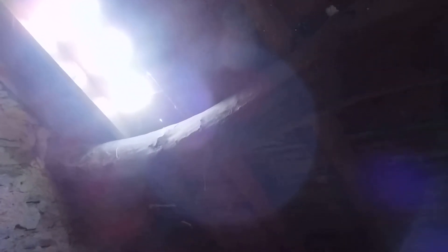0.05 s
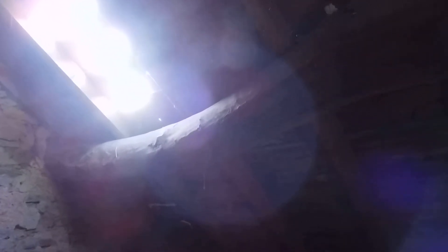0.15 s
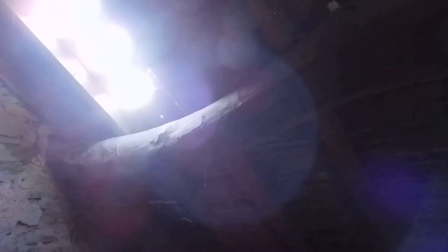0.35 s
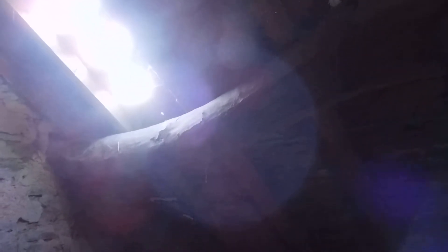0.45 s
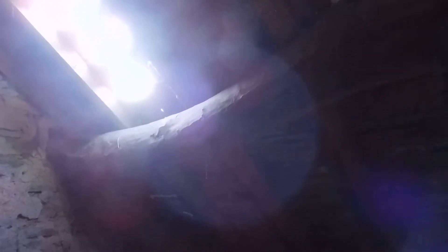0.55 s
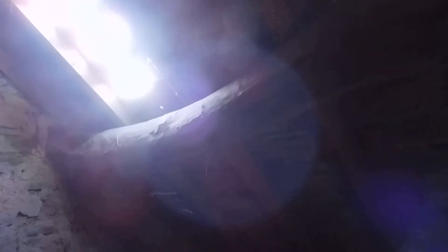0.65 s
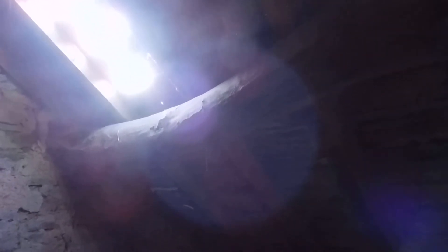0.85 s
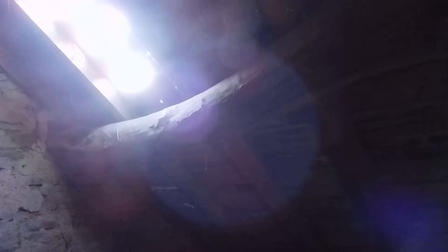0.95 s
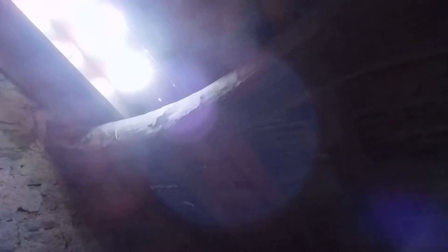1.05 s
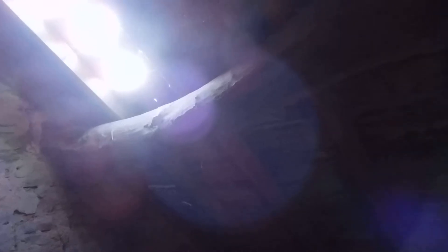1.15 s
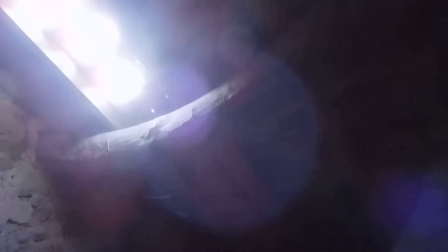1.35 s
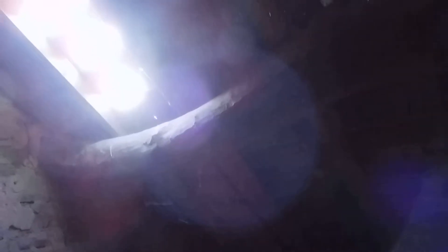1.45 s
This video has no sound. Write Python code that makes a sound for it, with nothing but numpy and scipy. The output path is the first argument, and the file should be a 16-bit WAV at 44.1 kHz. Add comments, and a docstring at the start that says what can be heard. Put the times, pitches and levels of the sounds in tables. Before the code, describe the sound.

Boards being moved, knocking sharply and scraping over grit in a small wooden space.

```python
"""Boards and dry debris are shifted close by in a low, dusty wooden space.
Over faint background noise, weight bumps on the boards, gritty scrapes begin, and wood rubs with a
thin rasp before it lands in a sharp knock. Crumbs snap among more scrapes and a lesser knock, then a
second sharp knock falls. A hollow thud follows, and light taps and scrapes close the scene.
Throughout, near walls throw everything back in a short, boxy tail."""
import sys
import numpy as np
from scipy import signal
from scipy.fft import rfft, irfft
from scipy.io import wavfile

SR = 44100
rng = np.random.default_rng(int(sys.argv[2]) if len(sys.argv) > 2 else 0)


def transcribe(u):
    """Save the signal u as a 16-bit wav file named by the first command-line argument.

    u: samples, shape (n,) or (channels, n), limited to [-1, 1]; the rate is SR.
    q: integer samples, one column per channel.
    """
    v = np.clip(np.atleast_2d(u).T, -1, 1)
    q = np.round(v * 32767).astype(np.int16)
    wavfile.write(sys.argv[1], SR, q)


N = 66150


def amp(db):
    """The decibel scale: amplitude grows tenfold every 20 dB."""
    return 10 ** (np.asarray(db) / 20)


def unit_rms(x):
    """Normalisation to a root mean square of 1."""
    return x / np.sqrt(np.mean(x ** 2) + 1e-20)


def curve_at(points, hz):
    """Interpolation on a logarithmic frequency axis."""
    frequency, value = np.transpose(points)
    return np.interp(np.log(hz + 1), np.log(frequency + 1), value)


def add(mix, start_s, sound):
    """Superposition: a sound sums into the mix from its start time."""
    part = mix[max(round(start_s * SR), 0):][:len(sound)]
    part += sound[:len(part)]


def convolve(x, response):
    """Convolution: each input sample launches a copy of the impulse response, channel by channel."""
    return signal.fftconvolve(np.atleast_2d(x), np.atleast_2d(response), axes=1)[:, :N]


def equalise(x, spectrum, share=1):
    """Zero-phase filtering by a spectrum whose decibels are scaled by share."""
    hz = np.fft.rfftfreq(x.shape[-1], 1 / SR)
    return irfft(rfft(x) * amp(share * curve_at(spectrum, hz)), x.shape[-1])


def click(spectrum, tilt_db_per_octave=0, size=2048):
    """Minimum phase: the most compact causal pulse with a given spectrum, at unit energy."""
    hz = abs(np.fft.fftfreq(size, 1 / SR))
    log_gain = np.log(amp(curve_at(spectrum, hz) + tilt_db_per_octave * np.log2(hz + 100)))
    pulse = np.fft.ifft(np.exp(np.conj(signal.hilbert(log_gain)))).real[:size // 2]
    return pulse / np.linalg.norm(pulse)


def widen(mid, side, width):
    """Mid-side stereo: the filtered side signal adds on the left and subtracts on the right."""
    side = equalise(side, width)
    return np.array([mid + side, mid - side])


def stroke(peak_s, rise_s, fall_s):
    """Contact pressure: a Gaussian rise to the peak, then exponential decay."""
    t = np.arange(N) / SR - peak_s
    return np.exp(-(np.minimum(t, 0) / rise_s) ** 2 - 2 * np.maximum(t, 0) / fall_s)


def slips(rate_per_s=5500, spread_db=4):
    """Shot noise: a dense random train of tiny slips of uneven size."""
    size = amp(spread_db * np.minimum(rng.exponential(1, N), 3))
    return unit_rms(size * rng.choice([-1, 1], N) * (rng.random(N) < rate_per_s / SR))


# Spectrum of the airy noise: frequency_hz, level_db
AIR_SPECTRUM = [(20, -4.5), (45, -11), (90, -13), (200, -9.5), (500, -3.5), (1000, -2), (2200, -4.5),
                (4000, -10.5), (8000, -16.5), (15500, -22.5)]
# Stereo width of the airy noise: frequency_hz, side_minus_mid_db
AIR_WIDTH = [(50, -11), (200, -4), (500, -1), (1000, 0), (16000, 0)]
# Envelopes of the airy noise, the low mids and the rumble: time_s, level_db
AIR_ENVELOPE = [(0, -54), (.75, -52.5), (1.25, -55), (1.5, -55.5)]
LOW_MID_ENVELOPE = [(0, -62), (.4, -61), (.8, -63), (1.1, -70.5), (1.5, -81)]
RUMBLE_ENVELOPE = [(0, -72), (.3, -90), (.52, -68), (.65, -79), (.8, -70), (1, -94), (1.5, -87)]
def background(rumble_hz=50):
    """Diffuse field: partly correlated noise in airy, dull and rumbling bands that drift in level."""
    t = np.arange(N) / SR
    air, low_mids, rumble = (widen(*rng.standard_normal((2, N)), width)
                             for width in (AIR_WIDTH, ROOM_WIDTH, ROOM_WIDTH))
    air = equalise(air, AIR_SPECTRUM)
    low_mids = equalise(low_mids, BUMP_SPECTRUM)
    rumble = signal.sosfilt(signal.butter(2, rumble_hz, fs=SR, output="sos"), rumble)
    bands = [(air, AIR_ENVELOPE), (low_mids, LOW_MID_ENVELOPE), (rumble, RUMBLE_ENVELOPE)]
    return sum(unit_rms(band) * amp(np.interp(t, *np.transpose(envelope))) for band, envelope in bands)


# Weight bearing on the boards: peak_s, rise_s, fall_s, level_db
BUMP_STROKES = [(0.116, 0.0066, .04, -47.5), (0.244, 0.047, 0.11, -46.5), (.375, 0.014, 0.066, -55),
                (0.484, 0.036, 0.04, -39), (.62, .03, 0.047, -60), (.705, 0.039, 0.041, -42),
                (.840, 0.0082, 0.037, -47), (.955, 0.023, 0.05, -67)]
# Dull response of the boards: frequency_hz, level_db
BUMP_SPECTRUM = [(30, -43), (90, -22.5), (150, -11.5), (240, -7.5), (330, -9), (420, 3.5), (490, -1.5),
                 (565, 1.5), (640, -0.5), (800, 4.5), (1300, -27), (4000, -57), (16000, -73)]
def bumps():
    """Forced vibration: shifting weight drives the low resonances of the boards in soft thumps."""
    force = sum(amp(db) * stroke(peak, rise, fall) for peak, rise, fall, db in BUMP_STROKES)
    return convolve(force * slips(), click(BUMP_SPECTRUM))[0]


# Scraping strokes: peak_s, rise_s, fall_s, board_level_db, grit_level_db
SCRAPE_STROKES = [(0.119, 0.014, 0.03, -48.5, -54.5), (0.131, 0.013, 0.016, -49, -62),
                  (.208, 0.033, 0.038, -43, -61), (0.228, 0.0091, 0.011, -33.5, -59),
                  (0.235, 0.0046, 0.041, -23, -34.5), (0.358, 0.016, 0.046, -51, -50.5),
                  (0.376, 0.015, 0.033, -45.5, -58.5), (0.454, 0.023, 0.016, -37, -59),
                  (0.468, 0.0042, 0.034, -25.5, -37.5), (0.49, .012, 0.019, -33.5, -39),
                  (.515, 0.0031, 0.0034, -28, -33.5), (.610, 0.061, 0.05, -52, -77),
                  (.674, 0.022, 0.017, -45, -55), (0.685, 0.0053, 0.03, -29.5, -40.5),
                  (0.712, 0.0063, 0.01, -30, -50), (0.836, 0.0086, 0.042, -46, -68),
                  (0.947, 0.019, 0.05, -35.5, -45.5), (1.048, 0.026, 0.12, -51, -56.5),
                  (1.079, 0.0063, 0.026, -49.5, -67), (1.17, .012, 0.032, -49, -61),
                  (1.198, 0.011, 0.046, -46, -52.5), (1.37, 0.018, 0.044, -47.5, -49.5),
                  (1.402, 0.0065, 0.0095, -50.5, -60)]
# Response of the boards to one slip: frequency_hz, level_db
SCRAPE_SPECTRUM = [(40, -40), (140, -28), (280, -27), (420, -6), (650, -8.5), (1000, 1.5), (1500, -0.5),
                   (2500, -1.5), (3500, -12.5), (6000, -22), (16000, -68.5)]
def scrapes():
    """Stick-slip friction: the slips under each stroke shake the boards."""
    force = sum(amp(db) * stroke(peak, rise, fall) for peak, rise, fall, db, _ in SCRAPE_STROKES)
    return convolve(force * slips(), click(SCRAPE_SPECTRUM))[0]


# Spectrum of one crushed grain: frequency_hz, level_db
GRIT_SPECTRUM = [(300, -39), (1500, -6.5), (3500, 2.5), (5000, -2), (7500, -6), (11000, -8), (16000, -23)]
def grit():
    """Granular crushing: dust crunches in tiny bright clicks under the scraping strokes."""
    force = sum(amp(db) * stroke(peak, rise, fall) for peak, rise, fall, _, db in SCRAPE_STROKES)
    return convolve(force * slips(), click(GRIT_SPECTRUM))[0]


# Wood sliding on wood: peak_s, rise_s, fall_s, level_db, pitch_hz, bandwidth_hz
RUB_STROKES = [(.176, 0.00097, 0.02, -42, 2500, 420), (.215, .02, 0.04, -44, 2560, 400),
               (0.357, 0.0037, 0.019, -46.5, 2700, 394), (.382, 0.016, 0.043, -47.5, 873, 202),
               (.424, .002, 0.029, -42, 2590, 300), (0.941, 0.015, 0.025, -41.5, 4400, 2630)]
def rubs():
    """Resonance driven by friction: in each rub, slips excite one damped mode into a rasp."""
    out, t = np.zeros(N), np.arange(SR // 40) / SR
    for peak, rise, fall, db, hz, bandwidth in RUB_STROKES:
        ring = t * np.exp(-np.pi * bandwidth * t) * np.sin(2 * np.pi * hz * t)
        out += amp(db) * stroke(peak, rise, fall) * unit_rms(convolve(slips(), ring)[0])
    return out


# Wooden knocks and taps: start_s, level_db, tilt_db_per_octave, pitch_ratio
KNOCK_CONTACTS = [(.2313, 2.5, 3.3, 0.96), (0.2317, -3.5, -7.2, 0.81), (.2352, -2, -3.5, 1.1),
                  (.2369, 4, -3.5, 1.226), (.2522, -1, -2.5, 1.07), (0.4726, -0.5, -0.5, 0.85),
                  (.6805, 6, 0.1, 0.96), (0.6822, 0.5, 0.5, 0.85), (0.6855, 2.5, -2.5, 0.67),
                  (.6873, -2.5, -1.5, .95), (0.7076, -18, -10, 0.7), (.8250, -26.5, 0, 1.3),
                  (0.8553, -22, 0, 0.76), (1.0738, -26.5, 3, 0.88), (1.3561, -19.5, -4.5, 0.83),
                  (1.3972, -19.5, -3.5, .68)]
# Spectrum of the contact crack before tilt: frequency_hz, level_db
CRACK_SPECTRUM = [(40, -58.5), (150, -36.5), (400, -15.5), (800, -3.5), (1250, 3.5), (1800, 6), (2300, -4),
                  (3000, -5), (4200, -19), (7000, -27), (11000, -51), (16000, -56)]
# Modes of the wood before each contact's pitch ratio and tilt: pitch_hz, level_db, t60_s
KNOCK_MODES = [(930, -28.5, 0.019), (1320, -20.5, 0.012), (1804, -16, 0.012), (2627, -20.5, 0.014),
               (3106, -23.5, 0.012)]
def knocks(crack_db=-2, swell_s=0.00041):
    """Impact excitation: a crack and heavily damped wooden modes, pitched by where the contact lands."""
    out, t = np.zeros(N), np.arange(1024) / SR
    pivot_hz = KNOCK_MODES[2][0]  # the tilt turns about the strongest mode
    for start, db, tilt, pitch_ratio in KNOCK_CONTACTS:
        ring = np.zeros(len(t))
        for k, (hz, mode_db, t60) in enumerate(KNOCK_MODES):
            decay = amp(mode_db + tilt * np.log2(hz / pivot_hz) - 60 * t / t60)
            ring += (-1) ** k * decay * np.sin(2 * np.pi * pitch_ratio * hz * t)
        crack = amp(crack_db) * click(CRACK_SPECTRUM, tilt)
        add(out, start, amp(db) * (crack + ring * np.minimum(t / swell_s, 1)))
    return out


# Single crumbs breaking: start_s, level_db
CRUMB_SNAPS = [(0.338, -25), (.371, -20), (.559, -33), (0.775, -25.5), (1.013, -26.5), (1.045, -24.5),
               (1.073, -24), (1.104, -34), (1.158, -31.5), (1.205, -35.5)]
def crumbs(decay_s=0.0015):
    """Brittle fracture: each crushed crumb releases a brief burst of bright noise."""
    snaps, t = np.zeros(N), np.arange(512) / SR
    for start, db in CRUMB_SNAPS:
        burst = rng.standard_normal(len(t)) * np.exp(-t / decay_s)
        add(snaps, start, amp(db) * burst / np.linalg.norm(burst))
    return convolve(snaps, click(GRIT_SPECTRUM))[0]


# Modes of the hollow thud: pitch_hz, level_db, t60_s
HOLLOW_MODES = [(556, -42.5, 0.11), (780, -28, 0.018), (1062, 1.5, 0.0094), (1525, -24, 0.021),
                (2440, -23.5, 0.01)]
def thud(start_s=0.8238, swell_s=0.0042):
    """Damped free vibration: a soft contact swells into a few hollow modes that die away."""
    out, t = np.zeros(N), np.arange(SR // 10) / SR
    ring = sum(amp(db - 60 * t / t60) * np.sin(2 * np.pi * hz * t) for hz, db, t60 in HOLLOW_MODES)
    add(out, start_s, ring * np.minimum(t / swell_s, 1) ** 2)
    return out


# Echoes from near surfaces: delay_s, gain_ratio
NEAR_ECHOES = [(.0011, 0.098), (.0056, 0.17), (0.0272, 0.11)]
def early_reflections(size=2048):
    """Specular reflection: weaker, delayed copies follow the direct sound."""
    taps = np.zeros(size)
    taps[0] = 1
    for delay, gain in NEAR_ECHOES:
        add(taps, delay, np.array([gain]))
    return taps


# Reverberation time: frequency_hz, t60_s
ROOM_DECAY = [(100, 0.44), (400, 0.28), (1000, 0.16), (2500, 0.19), (5000, 0.12), (14000, 0.11)]
# Starting spectrum of the tail: frequency_hz, level_db
ROOM_SPECTRUM = [(100, -1.5), (400, -1), (1000, 3), (2500, -2), (5000, 2), (14000, -2.5)]
# Stereo width of the room's sound: frequency_hz, side_minus_mid_db
ROOM_WIDTH = [(100, -13), (450, -13), (1000, -8), (2000, -4), (4000, -2), (12000, -1)]
# Lingering room resonances: pitch_hz, level_db, t60_s
ROOM_RESONANCES = [(420.7, -47, 0.17), (560.3, -40, 0.17), (1094, -63.5, 0.19), (1334, -51, 0.3),
                   (1770, -62, 0.093)]
def room_tail(build_s=0.0099, size=22016):
    """Reverberation: dense reflections decay exponentially in each band, beside a few room modes."""
    band_hz, frame_s, bands = signal.stft(rng.standard_normal((2, size)), SR, nperseg=256)
    decay_db = 60 * frame_s / curve_at(ROOM_DECAY, band_hz)[:, None]
    bands = bands * amp(curve_at(ROOM_SPECTRUM, band_hz)[:, None] - decay_db)
    mid, side = signal.istft(bands, SR, nperseg=256)[1][:, :size]
    t = np.arange(size) / SR
    tail = widen(mid, side, ROOM_WIDTH) * np.minimum(t / build_s, 1)
    modes = sum(amp(db - 60 * t / t60) * np.sin(2 * np.pi * hz * t) for hz, db, t60 in ROOM_RESONANCES)
    return tail / np.linalg.norm(tail[0]) + modes


def in_room(source, direct_db, room_db, crossfade_s=0.93):
    """Superposition: direct sound, near echoes and a tail slowly blending two random reverberations."""
    angle = np.pi * np.arange(N) / SR / crossfade_s
    direct = convolve(source, early_reflections())
    tail = convolve(source * np.cos(angle), room_tail()) + convolve(source * np.sin(angle), room_tail())
    return amp(direct_db) * direct + amp(room_db) * tail


# Stereo width of close handling: frequency_hz, side_minus_mid_db
CLOSE_WIDTH = [(100, -17), (500, -17), (1000, -16), (2000, -13), (4000, -6), (12000, -5)]
# Phase by which the right channel trails the left: frequency_hz, lag_rad
RIGHT_LAG = [(100, 0), (500, .07), (1000, .16), (2000, .3), (4000, .35), (8000, .25), (16000, .1)]
# Leftward bias, of which each channel takes a share: frequency_hz, level_db
LEFT_BIAS = [(100, .6), (500, .8), (1100, -.6), (2200, -1), (4500, 1.9), (9000, 2.8), (16000, 2.6)]
def scene():
    """Phase and level cues: the contacts sum slightly left of centre, over the background."""
    left, right = (in_room(bumps(), direct_db=-0.5, room_db=-6.5)
                   + in_room(widen(scrapes(), scrapes(), CLOSE_WIDTH), direct_db=0.5, room_db=-8.5)
                   + in_room(widen(grit(), grit(), CLOSE_WIDTH), direct_db=-1.5, room_db=-8.5)
                   + in_room(rubs(), direct_db=-0.5, room_db=-2)
                   + in_room(knocks(), direct_db=-0.5, room_db=-7)
                   + in_room(crumbs(), direct_db=-3, room_db=-12)
                   + in_room(thud(), direct_db=1.5, room_db=-12))
    lag_rad = curve_at(RIGHT_LAG, np.fft.rfftfreq(N, 1 / SR))
    right = irfft(rfft(right) * np.exp(-1j * lag_rad), N)
    contacts = np.array([equalise(left, LEFT_BIAS, share=0.58), equalise(right, LEFT_BIAS, share=-0.46)])
    return contacts + background()


def record(dry):
    """Band limiting: a steep linear-phase low-pass removes the highest treble."""
    cutoff_hz = 15950
    lowpass = signal.firwin(511, cutoff_hz, window=("kaiser", 9), fs=SR)
    return signal.oaconvolve(dry, lowpass[None], "same")


dry = scene()
out = record(dry)
transcribe(out)
```